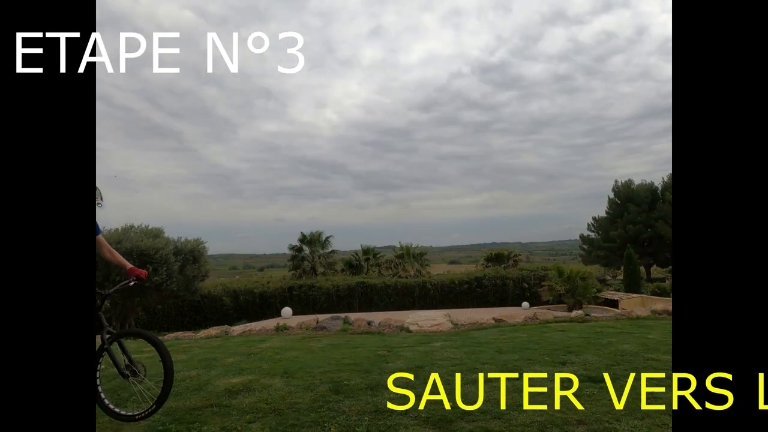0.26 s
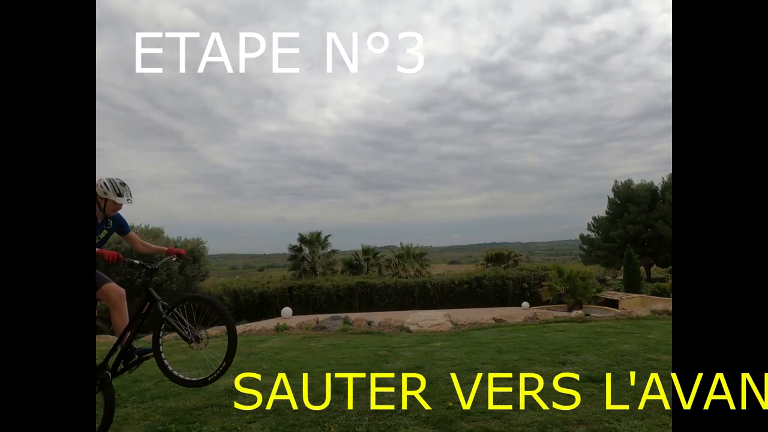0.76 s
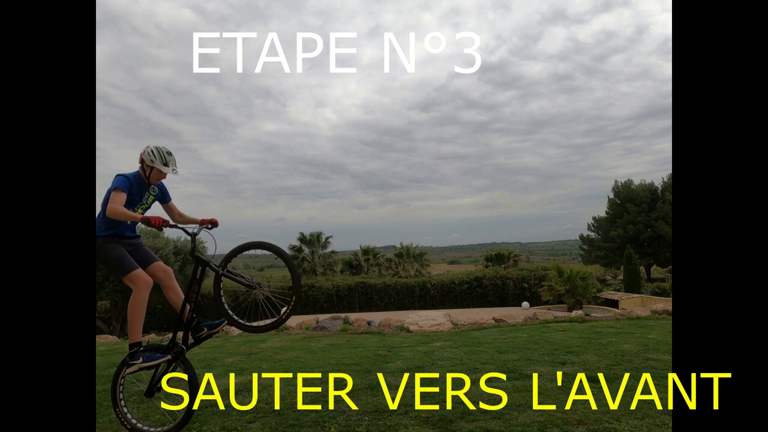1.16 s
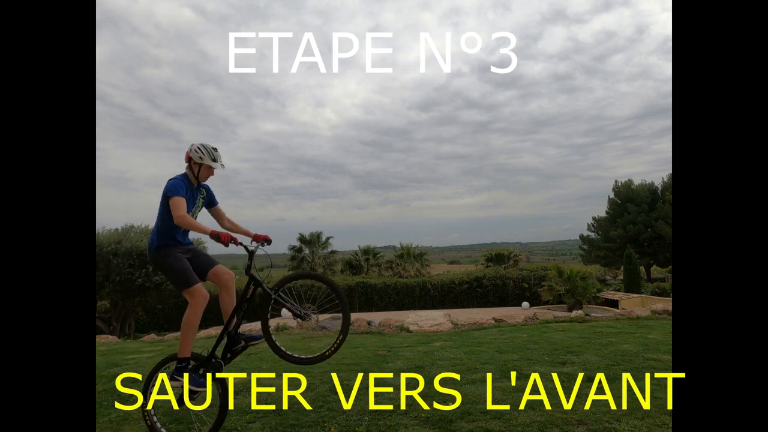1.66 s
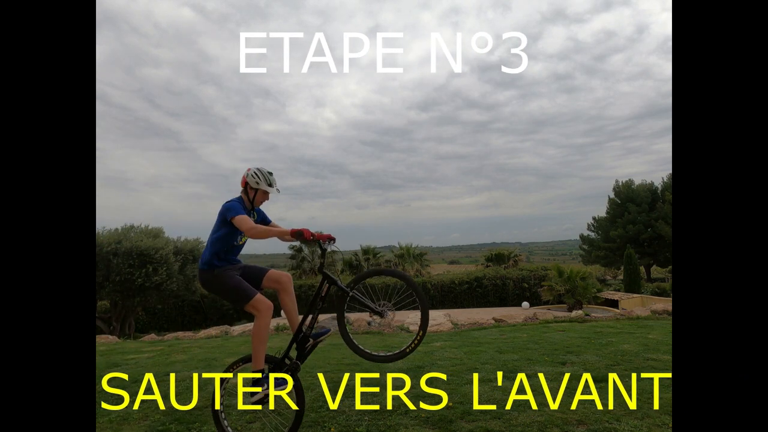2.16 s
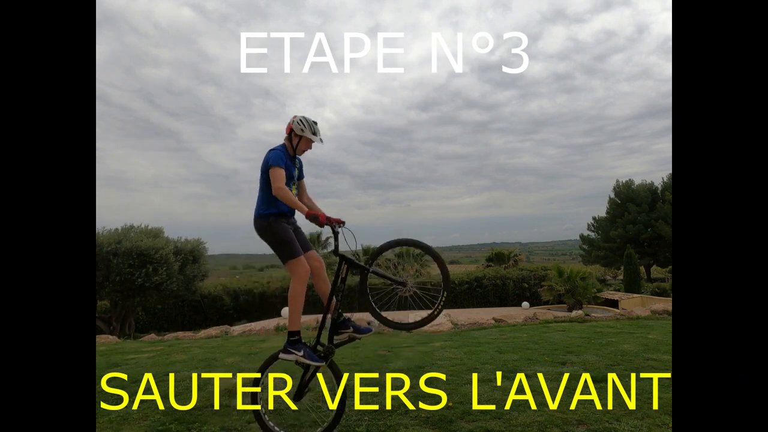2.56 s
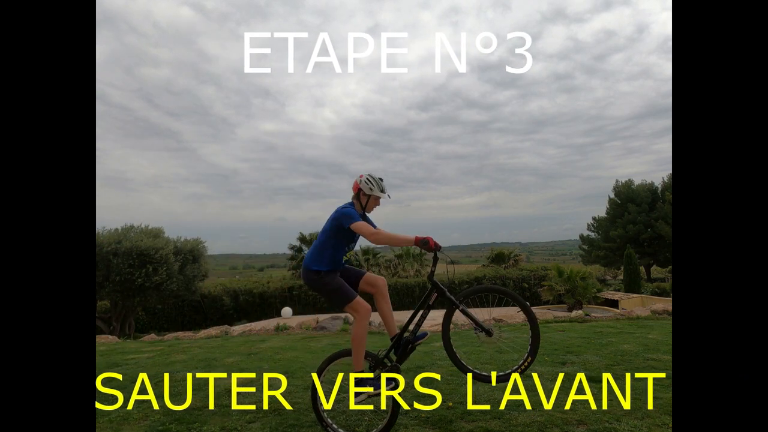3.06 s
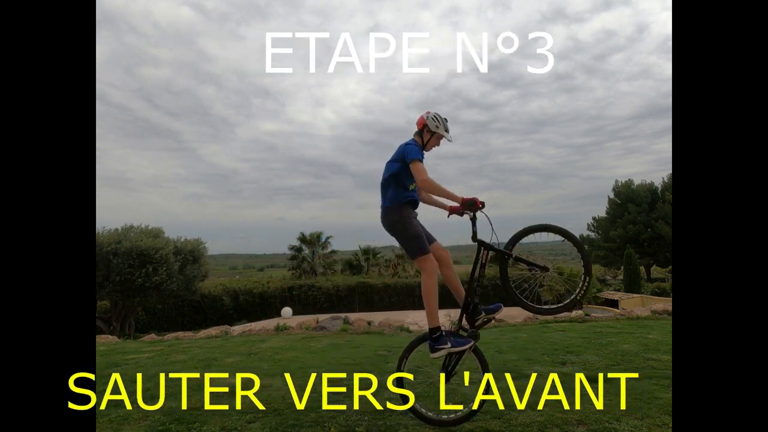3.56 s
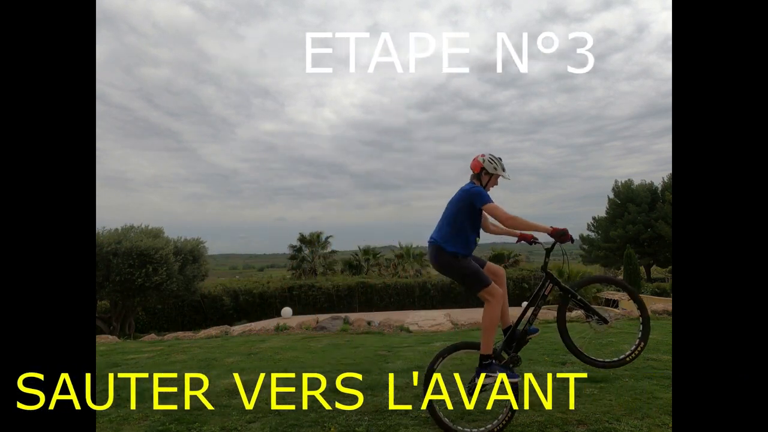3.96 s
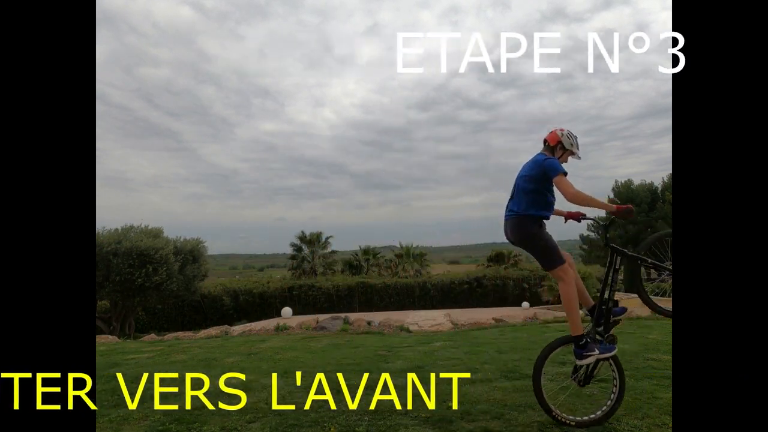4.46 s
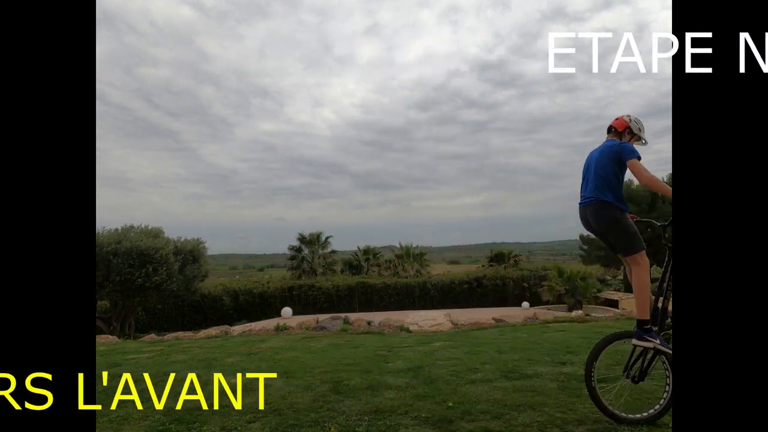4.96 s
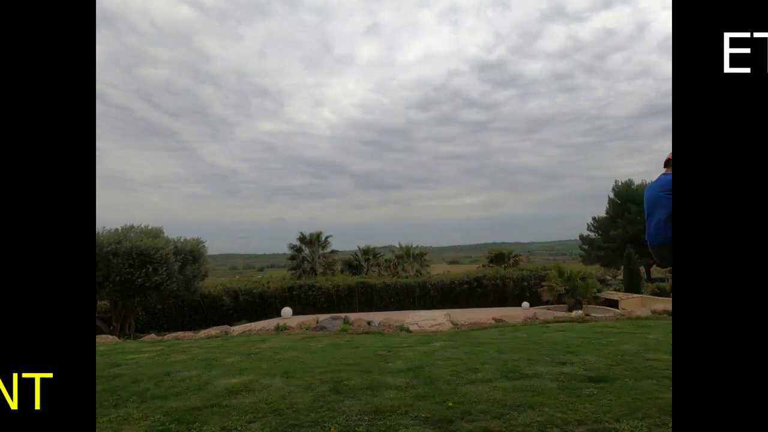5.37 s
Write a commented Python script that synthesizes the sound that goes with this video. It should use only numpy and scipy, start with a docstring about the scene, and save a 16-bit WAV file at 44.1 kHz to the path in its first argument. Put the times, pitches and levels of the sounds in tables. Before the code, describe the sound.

A bicycle's brake gives short, sharp squeaks as it hops on grass, with freehub ticking, soft tyre thuds and wind rumbling on the microphone.

```python
"""A garden lawn on a breezy day, with a trials bike hopping on its rear wheel near a stereo microphone.
The rear brake squeaks as its pads catch the rotor; between hops the freehub's pawls tick and whir,
the tyre thuds into the grass and the frame knocks. Hedge, wall and trees send back light echoes.
Wind rumbles on the microphone and briefly buffets its right port. Far off, over a soft wash of
open air, a small bird calls."""
import sys
import numpy as np
from scipy import signal
from scipy.fft import rfft, irfft
from scipy.io import wavfile

SR = 44100
rng = np.random.default_rng(int(sys.argv[2]) if len(sys.argv) > 2 else 0)


def generate_wav(signal):
    """Clip the signal to [-1, 1] and save it as 16-bit WAV at the path in sys.argv[1]."""
    frames = np.transpose(np.atleast_2d(signal))
    scaled = np.clip(frames, -1, 1) * 32767
    pcm = np.round(scaled).astype(np.int16)
    wavfile.write(sys.argv[1], SR, pcm)


N = 248062
TIME = np.arange(N) / SR


def amp(db):
    return 10 ** (np.asarray(db) / 20)


def unit(x):
    return x / np.sqrt(np.mean(x ** 2) + 1e-20)


def read(points, hz):
    """A spectrum's value, on a logarithmic frequency axis."""
    f, value = np.transpose(points)
    return np.interp(np.log(hz + 1), np.log(f + 1), value)


def follow(rows):
    """A curve's value at every sample."""
    return np.interp(TIME, *np.transpose(rows))


def add(mix, start_s, sound):
    part = mix[max(round(start_s * SR), 0):][:len(sound)]
    part += sound[:len(part)]


def noise(spectrum):
    """Noise of rms 1 with the given colour."""
    gain = amp(read(spectrum, np.fft.rfftfreq(N, 1 / SR)))
    return unit(irfft(rfft(rng.standard_normal(N)) * gain, N))


def wander(hz, size):
    """Smooth random drift of rms near 1, moving up to about hz times a second."""
    f = np.fft.rfftfreq(N, 1 / SR)
    return unit(irfft(rfft(rng.standard_normal(N)) * np.exp(-(f / hz) ** 2), N))[:size]


def colour(x, spectrum, size=1024):
    """A causal filter, so that clicks keep their sharp fronts."""
    log_gain = np.log(amp(read(spectrum, abs(np.fft.fftfreq(size, 1 / SR)))))
    ring = np.fft.ifft(np.exp(np.conj(signal.hilbert(log_gain)))).real
    return signal.oaconvolve(x, ring / np.linalg.norm(ring))[:N]


def brake(jitter=0.06, jitter_hz=170, flutter_db=5, bite_s=0.012, scrape_db=-15, sag=0.0073):
    """Pads stick and slip on the rotor: one mode swings up, and turns harsh while they bite hardest."""
    # brake squeaks: peak_s, level_db, pitch_hz, rise_s, fall_s, bite_at_s, tilt_db_per_octave, roughness
    squeaks = [(0.6, -18.5, 1137, 0.014, 0.032, 0.598, 1.5, 0.34),
               (0.976, -35, 1118, 0.0048, 0.011, 0.977, -5.5, 1.1),
               (1.25, -35, 1183, 0.013, 0.024, 1.251, -6.5, 1.11),
               (2.001, -38.5, 1135, 0.012, 0.021, 1.996, -20, 0.2),
               (3.292, -39, 1137, 0.0098, 0.02, 3.285, -8, 0.37),
               (3.569, -16.5, 1121, 0.013, 0.026, 3.579, -0.5, 0.22),
               (4.406, -30, 1147, 0.017, 0.018, 4.408, -7, 0.72),
               (4.623, -27, 1187, 0.01, 0.022, 4.619, -5, .9),
               (5.175, -21.5, 1151, 0.011, 0.03, 5.177, 0, 0.5)]
    # overtones of a hard squeak against its fundamental: frequency_hz, level_db
    overtones = [(2250, -3), (3400, -11), (4500, -13), (5650, -16), (6800, -22), (7900, -19.5),
                 (9100, -23.5), (10200, -26.5), (12000, -37.5), (15000, -45)]
    out, t = np.zeros(N), np.arange(-SR // 16, SR // 8) / SR
    for peak_s, db, hz, rise_s, fall_s, bite_at_s, tilt, roughness in squeaks:
        swing = np.exp(-(t / np.where(t < 0, rise_s, fall_s)) ** 2)
        bite = np.exp(-abs((t + peak_s - bite_at_s) / bite_s) ** 3)
        glide = 1 - sag * np.tanh(t / 0.016)  # the pitch sinks as the wheel stops
        waver = 1 + jitter * roughness * wander(jitter_hz, len(t))
        phase = 2 * np.pi * np.cumsum(hz * glide * waver) / SR
        tone = swing * np.sin(phase)
        for k in range(2, 14):
            hold = 0.24 if k == 2 else 0.069  # the octave outlasts the higher overtones
            envelope = swing ** 0.5 * (hold + (1 - hold) * bite)
            overtone_db = read(overtones, k * hz) + tilt * np.log2(k)
            overtone_db += flutter_db * roughness * wander(97, len(t))
            tone += amp(overtone_db) * envelope * np.sin(k * phase + 2 * np.pi * rng.random())
        scrape_band = signal.butter(2, [hz, 3500], "bandpass", fs=SR)
        scrape = unit(signal.lfilter(*scrape_band, rng.standard_normal(len(t))))
        tone += amp(scrape_db) * roughness * swing * bite * scrape
        add(out, peak_s + t[0], np.sqrt(2) * amp(db) * tone)
    return out


def freehub(rattle_s=0.031, rattle_db=-13, second_pawl_db=-3, second_pawl_s=.005, scatter_db=2):
    """Pawls drop off the ratchet's teeth as the hub turns; each snap briefly shakes hub and spokes."""
    # turns of the hub, whirring or ticking: start_s, end_s, click_db, first_teeth_per_s, last_teeth_per_s
    spins = [(0.005, 0.12, -44.5, 58, 67), (0.621, 0.843, -42, 79, 49), (1.148, 1.26, -40.5, 87, 71),
             (1.273, 1.529, -39.5, 33.5, 52.3), (1.926, 2.006, -40, 85, 63.5), (2.012, 2.156, -42, 30, 27),
             (2.172, 2.326, -39.5, 44.3, 53), (2.681, 2.789, -40, 48.3, 24.6),
             (2.847, 2.966, -40.5, 17.5, 20.6), (2.981, 3.146, -40, 94, 45), (3.473, 3.56, -40, 87, 77),
             (3.63, 3.73, -47.5, 76, 42), (3.768, 3.949, -43.5, 95, 50), (4.279, 4.6, -49, 41.6, 44),
             (4.613, 4.762, -42.5, 60, 84), (5.128, 5.247, -41, 90, 59), (5.26, 5.359, -45, 70, 70),
             (5.424, 5.621, -44, 67, 80)]
    # lone clicks as the cranks are nudged: start_s, click_db
    pawl_drops = [(0.91, -47), (1.118, -46), (3.667, -44)]
    # colour of a pawl's click: frequency_hz, gain_db
    pawl_colour = [(500, -19.5), (1200, -16.5), (2200, -2), (2550, -11.5), (2900, -4), (3400, -10.5),
                   (4900, -1), (6200, -5.5), (7200, -11), (8700, -7.5), (10500, -13.5), (12000, -19.5),
                   (13300, -19), (15500, -36)]
    out, t = np.zeros(N), np.arange(SR // 12) / SR
    snap = (1 - np.exp(-t / .0004)) * np.exp(-t / .003)
    decay = snap + amp(rattle_db) * np.exp(-t / rattle_s)
    teeth = list(pawl_drops)
    for start_s, end_s, db, first_rate, last_rate in spins:
        rate = np.linspace(first_rate, last_rate, max(round((end_s - start_s) * SR), 2))
        tooth_count = np.floor(np.cumsum(rate) / SR)
        for i in np.flatnonzero(np.diff(tooth_count, prepend=-1)):
            uneven_s = .04 * rng.standard_normal() / rate[i]
            teeth.append((start_s + i / SR + uneven_s, db))
    for tooth_s, db in teeth:
        lag_s = second_pawl_s * rng.uniform(0.55, 1.5)  # a second pawl drops a little later
        for drop_s, pawl_db in (tooth_s, db), (tooth_s + lag_s, db + second_pawl_db):
            strength = amp(pawl_db + scatter_db * rng.standard_normal())
            add(out, drop_s, strength * decay * rng.standard_normal(len(t)))
    return colour(out, pawl_colour)


def frame(level_db=-7, clatter_s=0.014, crack_db=-13):
    """Each jolt is a brief clatter of parts that rings the frame's resonances."""
    # knocks of the frame and drive: start_s, relative_db, treble_db
    knocks = [(0.892, -36.5, -14.5), (0.961, -40.5, 0.5), (1.357, -37, -14), (1.71, -33.5, -11),
              (1.901, -47.5, 3), (3.19, -42, 1.5), (3.777, -39.5, -7), (4.084, -41, -15), (4.922, -32, -15),
              (5.428, -37.5, -7.5)]
    # resonances of the frame: pitch_hz, width_hz, gain_db
    modes = [(603, 92, -12.5), (728, 67, -7), (1140, 110, -1), (1586, 400, 14), (2150, 170, 12),
             (3500, 340, 1.5)]
    out, t = np.zeros(N), np.arange(SR // 8) / SR
    for start_s, db, treble_db in knocks:
        clatter = rng.standard_normal(len(t)) * np.exp(-t / clatter_s)
        knock = amp(crack_db + treble_db) * signal.lfilter(*signal.butter(2, 6000, fs=SR), clatter)
        for hz, width_hz, mode_db in modes:
            ring = np.exp(-np.pi * width_hz * t) * np.sin(2 * np.pi * hz * t)
            gain = amp(mode_db + treble_db * np.log2(hz / 1100)) / np.linalg.norm(ring)
            knock += .5 * gain * signal.fftconvolve(clatter, ring)[:len(t)]
        add(out, start_s, amp(db + level_db) * knock)
    return out


def tyre(rise_s=0.013, decay_s=0.041, band_hz=(45, 130)):
    """The soft tyre thuds into the grass and dies away at once."""
    # landings of the rear wheel: start_s, level_db
    landings = [(1.344, -37), (2.17, -34), (2.975, -35), (3.765, -34.5)]
    out, t = np.zeros(N), np.arange(SR // 3) / SR
    band = signal.butter(2, band_hz, "bandpass", fs=SR, output="sos")
    envelope = np.minimum(t / rise_s, 1) * np.exp(-t / decay_s)
    for start_s, db in landings:
        shudder = unit(signal.sosfilt(band, rng.standard_normal(len(t))))
        add(out, start_s, amp(db) * envelope * shudder)
    return out


def wind(lumps_db=2.0, shared=0.46, bright_hz=110, brighten=0.32, usual_db=-33):
    """Lumpy rumble, partly shared by the microphone's ports; the harder it blows, the brighter it is."""
    # strength of the wind on the microphone: time_s, level_db
    breeze = [(0.0, -44.5), (0.2, -48.5), (0.34, -28), (0.45, -51), (0.53, -36), (0.8, -51.5),
              (1.31, -50.5), (1.34, -41.5), (2.08, -48), (2.17, -40), (2.57, -36.5), (2.61, -46),
              (2.85, -41), (3.69, -44.5), (3.9, -29.5), (4.01, -45.5), (4.29, -21.5), (4.65, -24.5),
              (4.74, -20), (4.82, -28.5), (4.9, -19), (5.04, -33), (5.18, -30.5), (5.29, -39.5),
              (5.32, -28), (5.45, -35.5), (5.62, -20)]
    # colour of the rumble: frequency_hz, gain_db
    rumble = [(11, -35), (18, -1.5), (54, 2.5), (139, -8), (231, -16), (321, -28.5), (354, -29.5),
              (560, -40), (790, -40), (900, -55), (1170, -73), (1980, -120)]
    common = np.sqrt(shared) * noise(rumble)
    ports = np.array([common + np.sqrt(1 - shared) * noise(rumble) for _ in range(2)])
    upper = signal.sosfiltfilt(signal.butter(2, bright_hz, "highpass", fs=SR, output="sos"), ports)
    strength_db = follow(breeze)
    ports += upper * (amp(brighten * (strength_db - usual_db)) - 1)
    lumps = unit(amp(lumps_db * wander(27, N)))
    return ports * np.sqrt(2 / (1 + shared)) * amp(strength_db) * lumps


def buffet(right_db=10, left_db=-7, churn_db=5, eddies_per_s=32, eddy_s=0.0056, fade_s=0.019):
    """A gust sheds sharp eddies that break on the right port over a dull churn, and graze the left."""
    # strength of the gust: time_s, relative_db
    gust = [(4.2, -72), (4.246, -24.5), (4.4, -29), (4.424, -51), (4.458, -23), (4.474, -39.5),
            (4.488, -29.5), (4.724, -33.5), (4.78, -51)]
    # colour of the eddies: frequency_hz, gain_db
    eddy_colour = [(30, -15.5), (120, -1.5), (330, -2.5), (600, -10), (900, -16), (1400, -28.5),
                   (2200, -53), (4000, -77)]
    start_s, end_s = gust[0][0], gust[-1][0]
    fade = np.clip(np.minimum(TIME - start_s, end_s - TIME) / fade_s, 0, 1)
    grazing = noise(eddy_colour)
    breaking = noise(eddy_colour) * unit(amp(1.5 * wander(125, N)))  # with a fast flutter
    churn = amp(churn_db) * signal.lfilter(*signal.butter(2, 350, fs=SR), noise(eddy_colour))
    force = np.full(N, amp(-14))  # the floor between eddies
    hit_s = start_s
    while hit_s < end_s:
        force += amp(rng.uniform(-1.5, 4.5)) * np.exp(-.5 * ((TIME - hit_s) / eddy_s) ** 2)
        hit_s += rng.uniform(.45, 1.55) / eddies_per_s
    ports = np.array([amp(left_db) * grazing, amp(right_db) * force * breaking + churn])
    return amp(follow(gust)) * fade * ports


def bird(length_s=0.05):
    """Thin rising whistles from a small bird far away."""
    # calls: start_s, level_db, first_hz, last_hz
    chirps = [(0.129, -60, 4470, 4970), (2.519, -58, 3720, 4200), (3.221, -59, 4490, 5050),
              (4.275, -57, 3860, 4200)]
    out, size = np.zeros(N), int(length_s * SR)
    for start_s, db, first_hz, last_hz in chirps:
        hz = np.linspace(first_hz, last_hz, size) * (1 + 0.011 * wander(150, size))
        add(out, start_s, amp(db) * np.hanning(size) * np.sin(2 * np.pi * np.cumsum(hz) / SR))
    return out


def air(wash_db=-49, swell_db=0.5, hum_hz=275, hum_db=-58):
    """The soft wash of open country, with a faint wavering hum."""
    # colour of the open air: frequency_hz, gain_db
    air_colour = [(59, -25), (100, -2), (149, -4), (281, -10), (333, -21), (541, -16), (682, -14.5),
                  (879, -17.5), (1180, -9.5), (1290, -12.5), (2750, -24.5), (4860, -29), (6950, -40.5),
                  (9340, -43.5), (15500, -73.5)]
    wash = amp(wash_db + swell_db * wander(4.1, N)) * noise(air_colour)
    hum = np.sin(2 * np.pi * np.cumsum(hum_hz * (1 + 0.014 * wander(14.4, N))) / SR)
    return wash + amp(hum_db + 3.8 * wander(13, N)) * hum


def wall_echoes(x, cutoff_hz=2500):
    """Walls throw back single, dulled echoes."""
    # reflections: delay_s, gain_db
    walls = [(0.034, -15), (.058, -21.5)]
    out, dulled = np.zeros(N), signal.lfilter(*signal.butter(1, cutoff_hz, fs=SR), x)
    for delay_s, db in walls:
        add(out, delay_s, amp(db) * dulled)
    return out


def garden_echoes(x, first_s=.012, echoes_per_s=2000):
    """Scattered echoes from hedge, wall and trees; the bass dies first and the midrange rings longest."""
    # decay of the echoes: frequency_hz, t60_s
    decay = [(200, 0.17), (1100, 0.45), (2300, 0.36), (5000, 0.24), (10000, 0.23), (16000, 0.43)]
    # the echoes swell as the bike nears the wall and trees: time_s, gain_db
    nearness = [(0.6, -1), (3.5, -4), (5.2, 5)]
    size = SR * 3 // 4
    taps = rng.choice([-1., 1.], size) * (rng.random(size) < echoes_per_s / SR)
    taps *= np.arange(size) > first_s * SR
    hz, t, bands = signal.stft(taps, SR, nperseg=256)
    tail = signal.istft(bands * amp(-60 * t / read(decay, hz)[:, None]), SR, nperseg=256)[1]
    return signal.fftconvolve(amp(follow(nearness)) * x, tail / np.linalg.norm(tail))[:N]


def turn_away(x, cutoff_hz=4200):
    """The bike loses treble as the rider turns away from the microphone."""
    # how much of the sound is dulled: time_s, share
    shade = [(3.7, 0.36), (4.3, 1), (5.62, 1)]
    dulled = signal.lfilter(*signal.butter(1, cutoff_hz, fs=SR), x)
    return x + follow(shade) * (dulled - x)


def two_ports(x, lead_s=.0009):
    """The microphone's ports hear short waves differently, so the treble is wider than the bass."""
    # side signal against mid: frequency_hz, gain_db
    port_gap = [(200, -20.5), (1200, -15), (2400, -13.5), (4400, -5.5), (8000, -2.5), (14000, 7)]
    hz = np.fft.rfftfreq(N, 1 / SR)
    phase_turn = np.exp(1j * (np.pi / 2 + 2 * np.pi * hz * lead_s))
    side = irfft(rfft(x) * amp(read(port_gap, hz)) * phase_turn, N)
    return np.array([x + side, x - side])


def scene(squeak_echo_db=-12, hub_echo_db=-14, knock_echo_db=-8):
    """The bike and its echoes on the lawn, the bird and open air behind, and wind on the microphone."""
    squeaks, hub, knocks = brake(), freehub(), frame()
    scattered = amp(squeak_echo_db) * squeaks + amp(hub_echo_db) * hub + amp(knock_echo_db) * knocks
    echoes = wall_echoes(squeaks + knocks) + garden_echoes(scattered)
    bike = turn_away(squeaks + hub + knocks + echoes)
    return two_ports(bike + bird() + air()) + tyre() + wind() + buffet()


def record(dry, cutoff_hz=15700):
    """The stereo image opens and closes again, and the highest treble is cut off."""
    # width of the stereo image: time_s, side_gain
    width = [(0, 0.043), (2.2, 0.045), (2.5, 0.3), (3.5, 0.74), (4.25, 1), (4.6, 0.78), (4.9, 0.26),
             (5.15, 0.07), (5.62, 0.022)]
    mid = dry.mean(0)
    image = mid + follow(width) * (dry - mid)
    lowpass = signal.firwin(511, cutoff_hz, window=("kaiser", 9), fs=SR)
    return signal.oaconvolve(image, lowpass[None], "same")


dry = scene()
out = record(dry)
generate_wav(out)
```